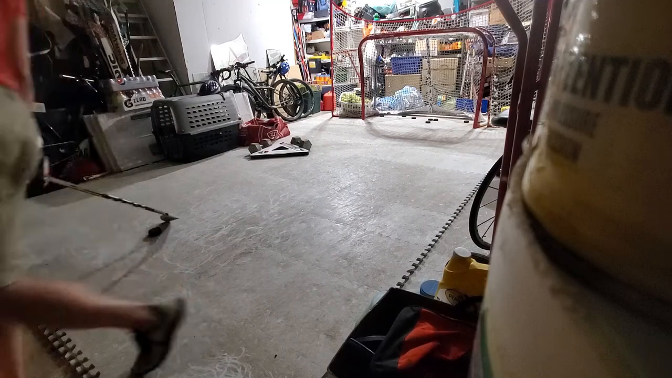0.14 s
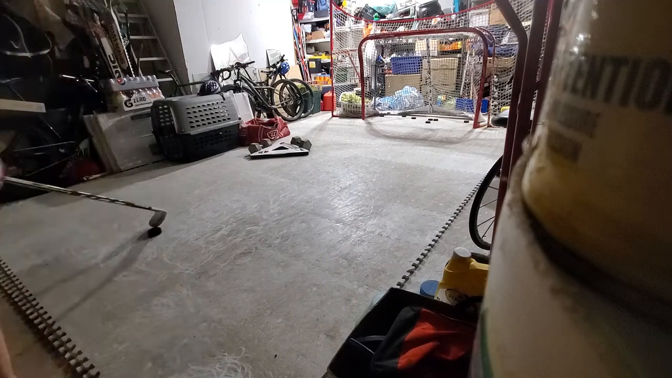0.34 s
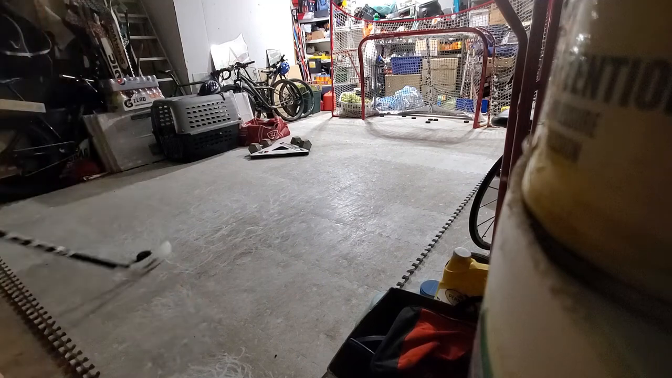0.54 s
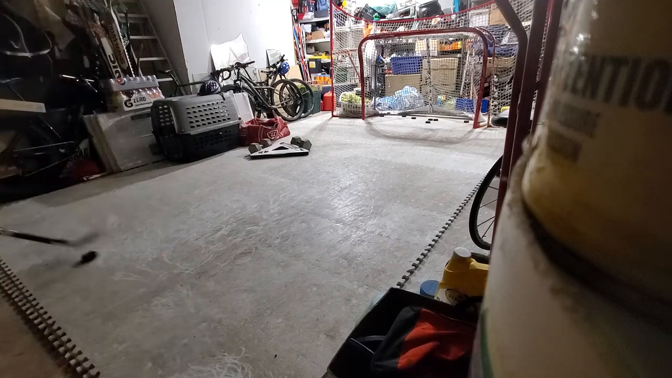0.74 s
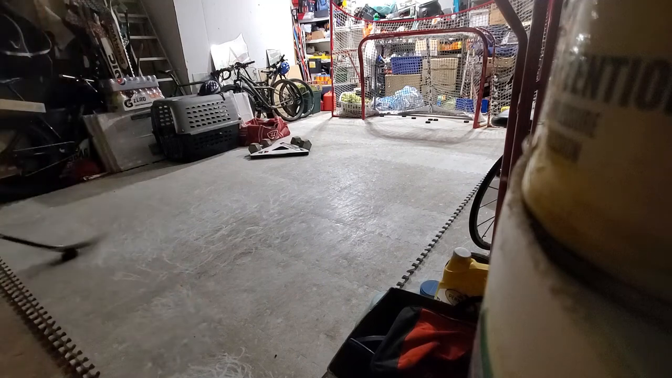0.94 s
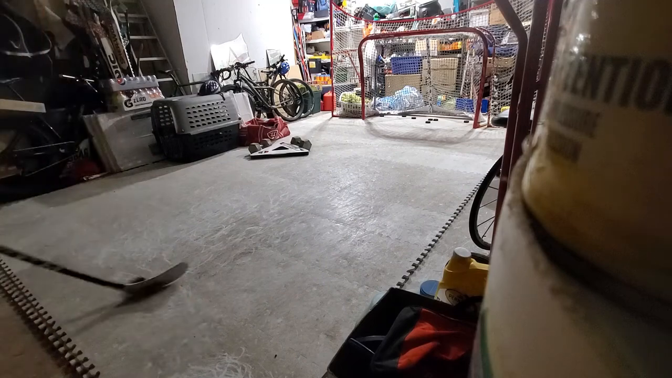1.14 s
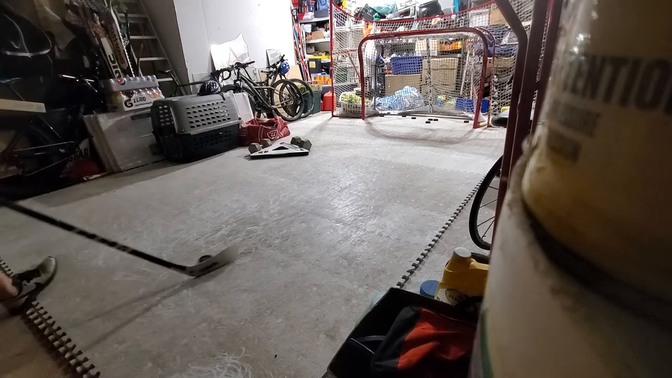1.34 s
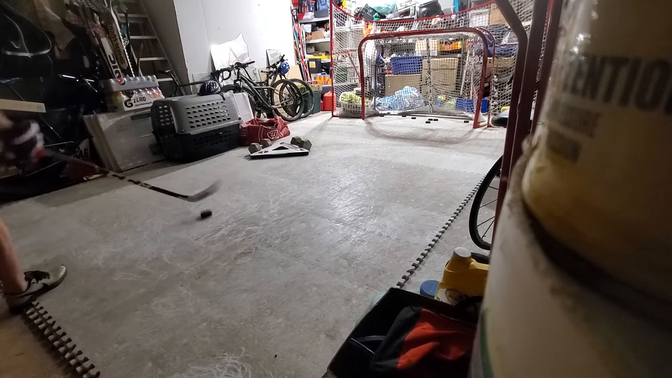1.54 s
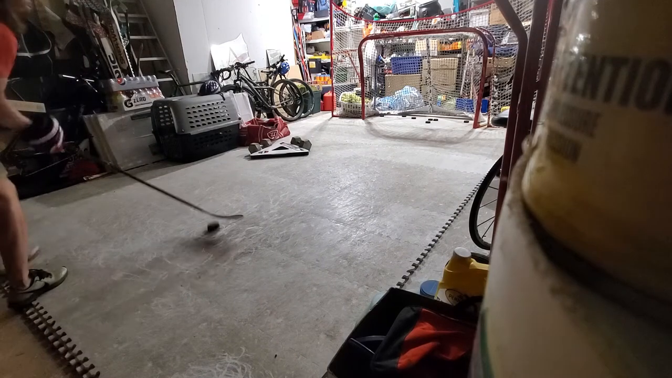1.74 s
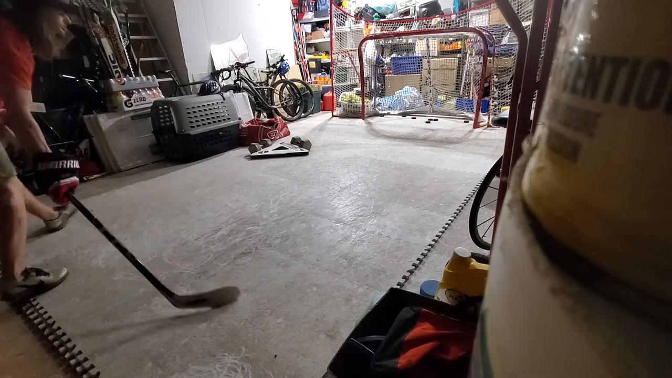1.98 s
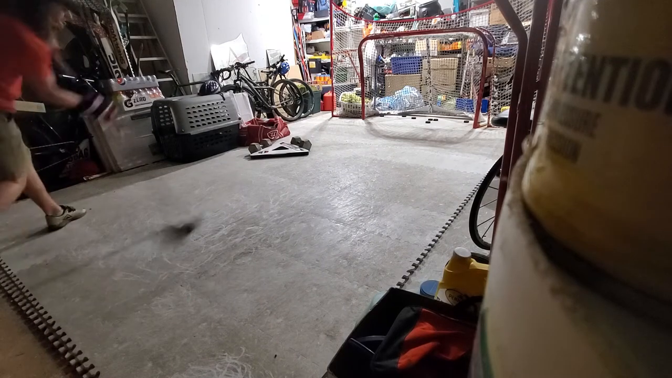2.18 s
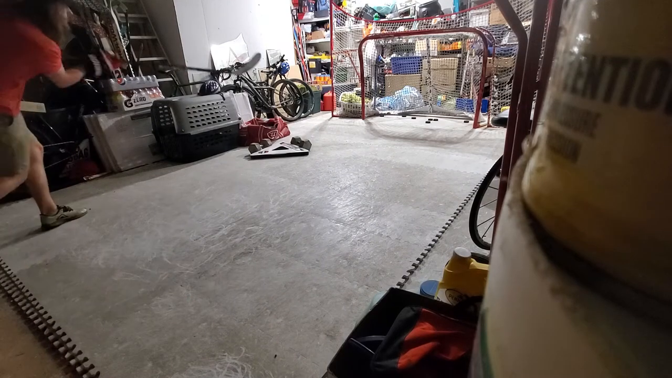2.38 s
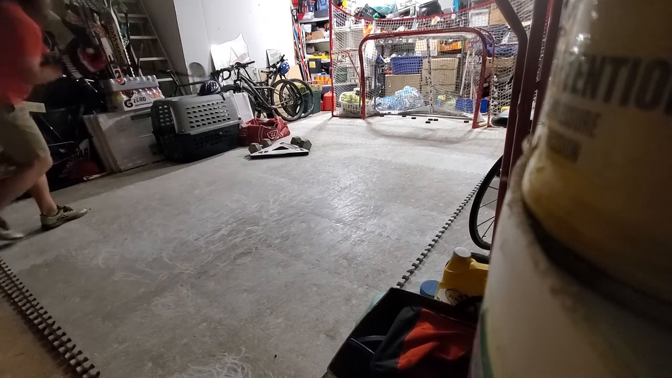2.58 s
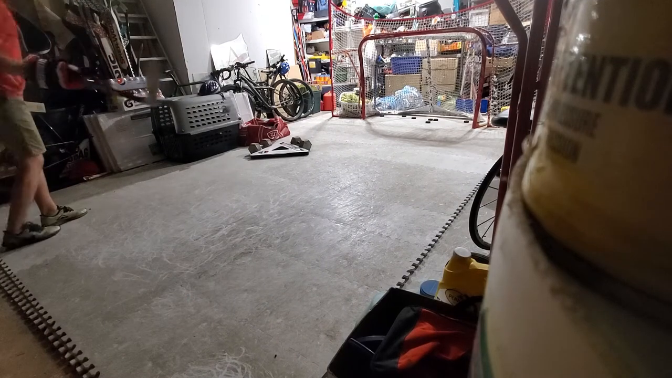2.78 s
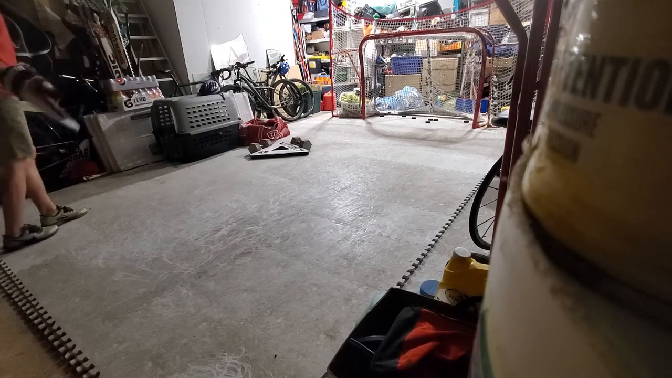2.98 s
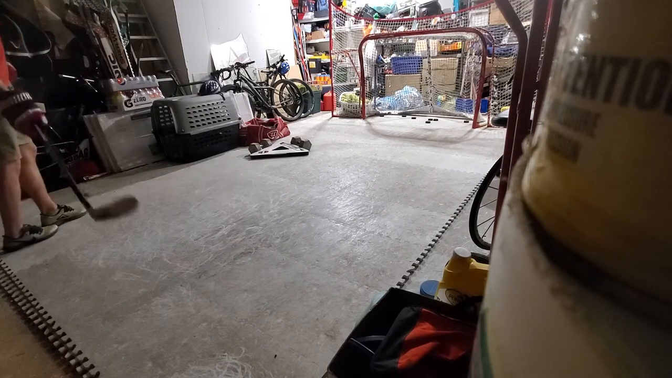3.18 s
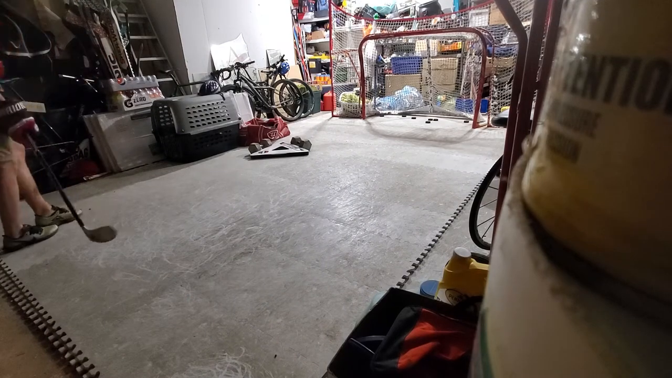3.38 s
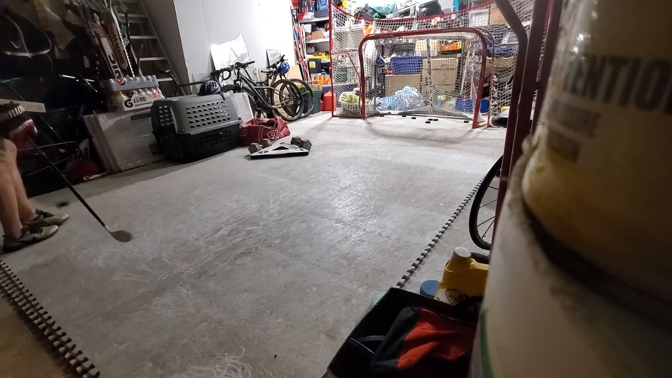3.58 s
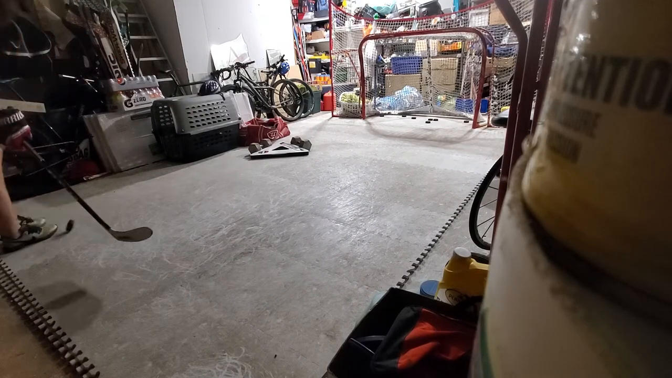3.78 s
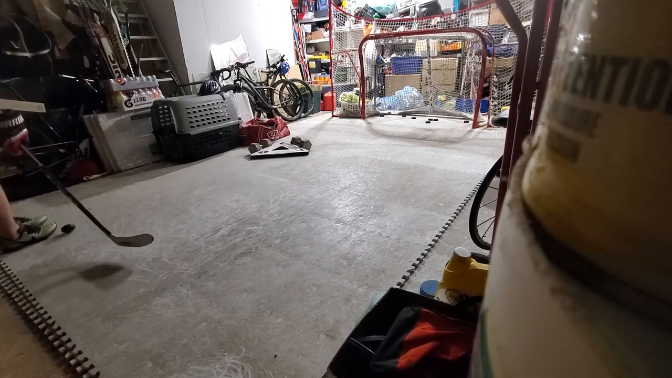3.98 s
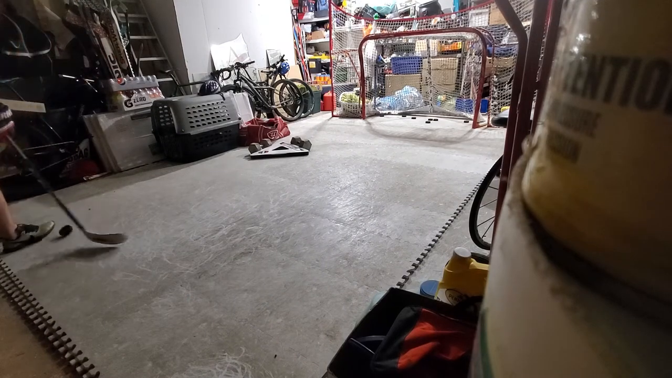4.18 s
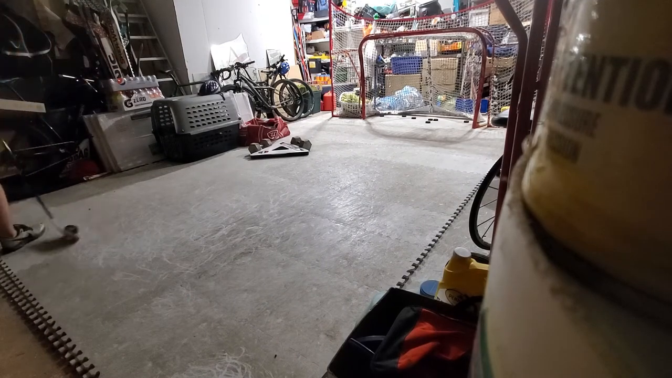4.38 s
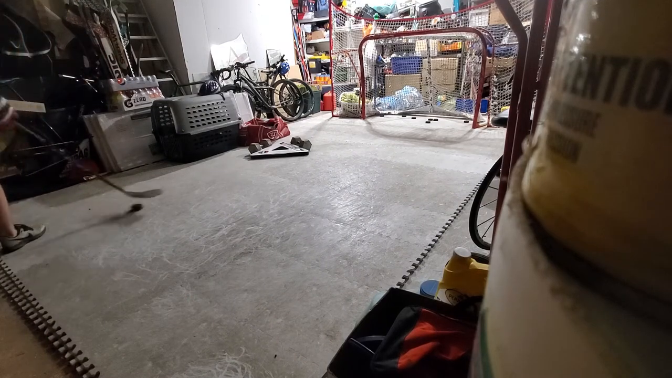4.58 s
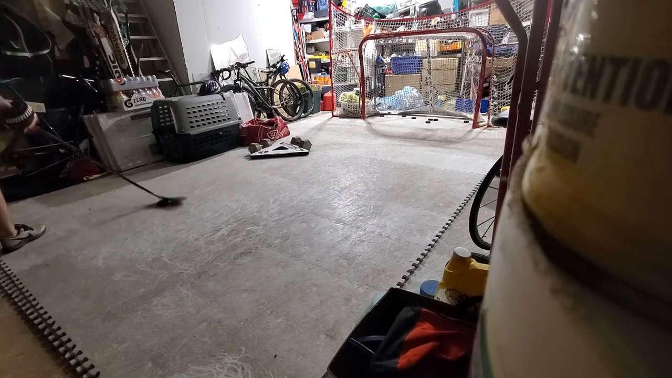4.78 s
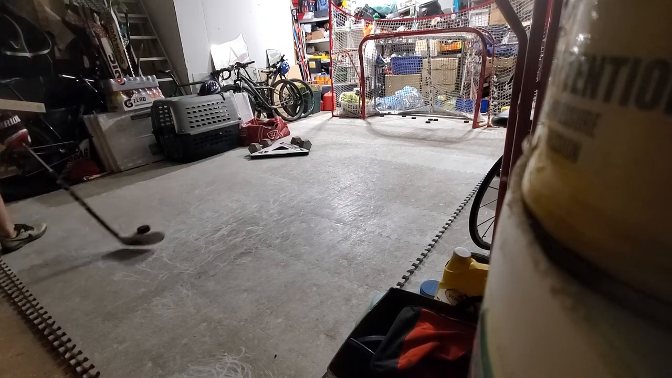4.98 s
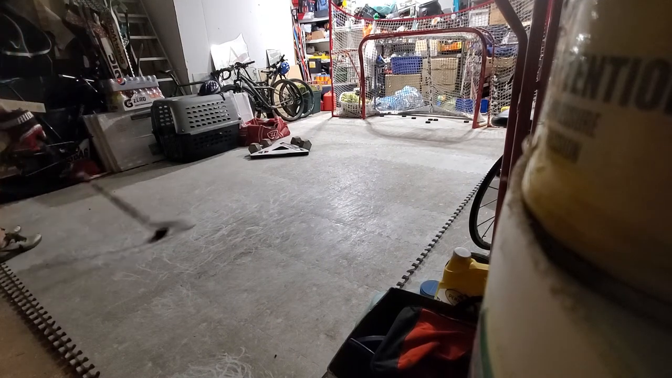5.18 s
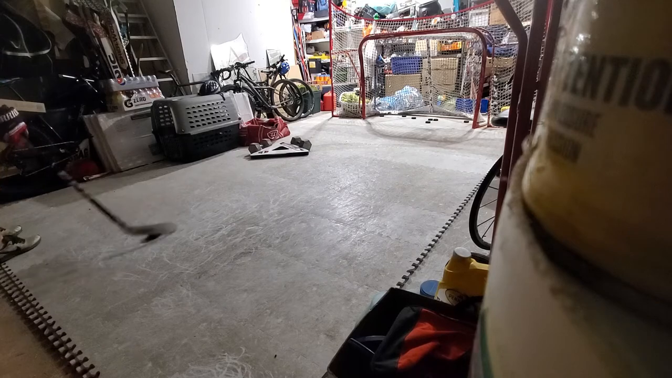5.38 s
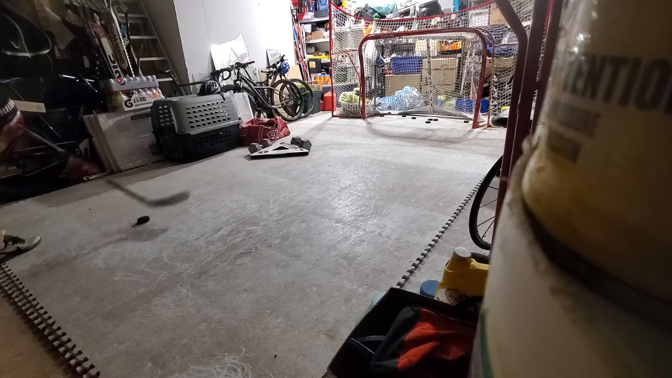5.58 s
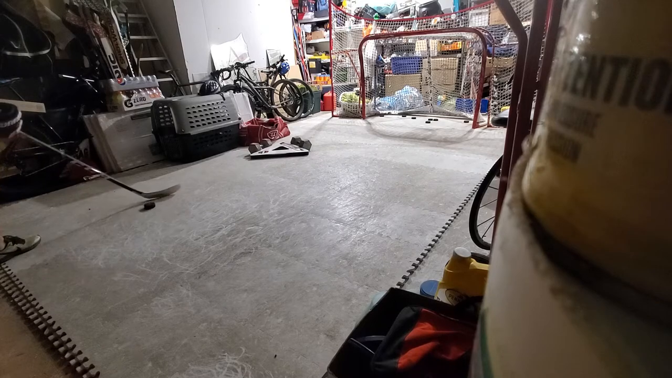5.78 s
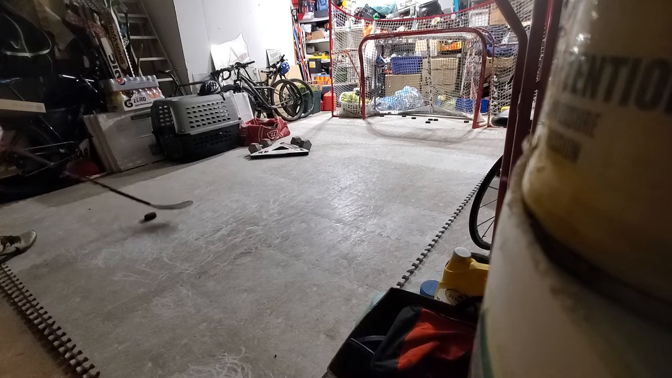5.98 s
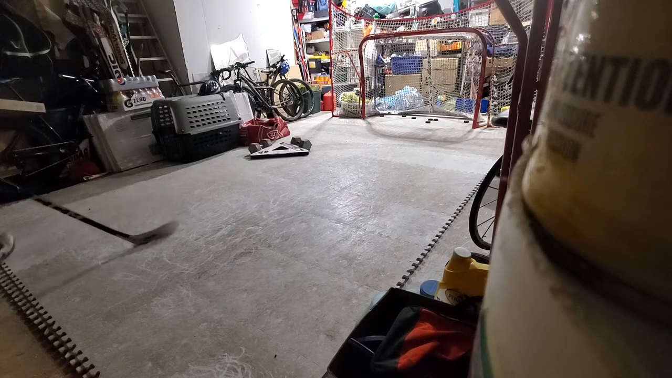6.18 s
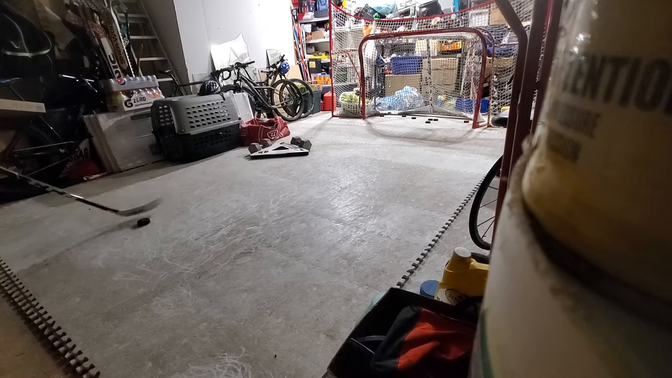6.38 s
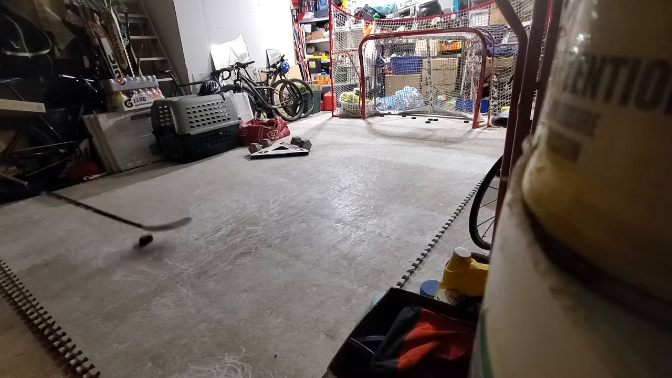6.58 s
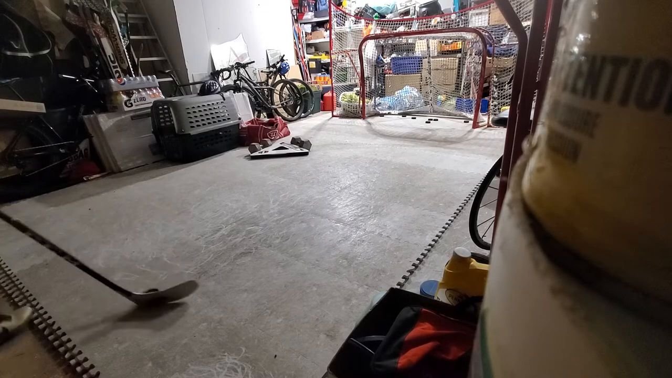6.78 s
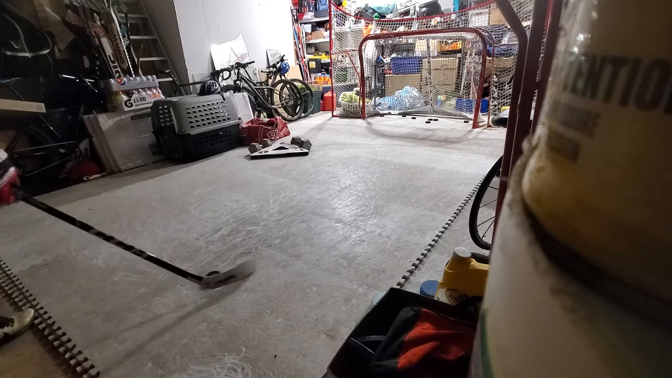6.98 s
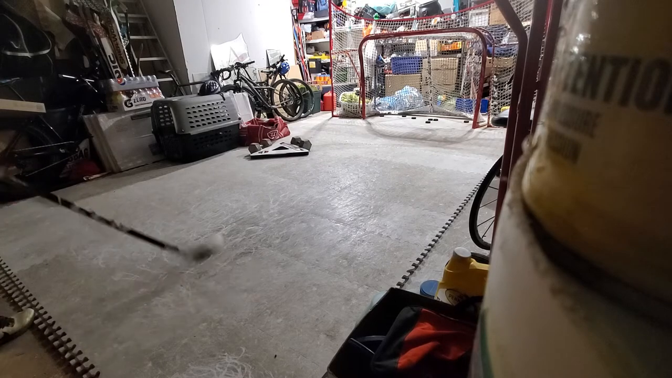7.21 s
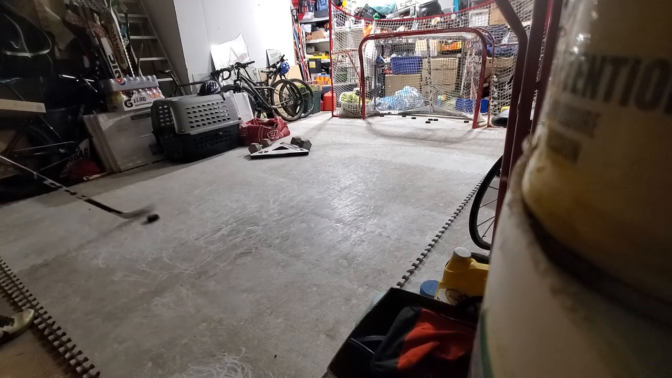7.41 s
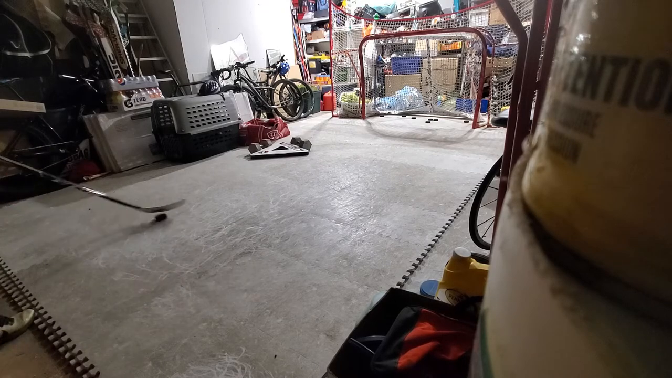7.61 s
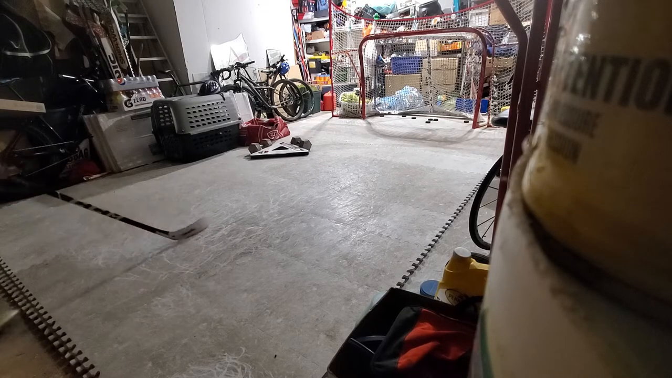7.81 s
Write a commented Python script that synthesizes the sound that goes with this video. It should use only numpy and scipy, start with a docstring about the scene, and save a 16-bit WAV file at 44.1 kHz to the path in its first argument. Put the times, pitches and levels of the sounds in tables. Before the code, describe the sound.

In a cluttered, hard-surfaced garage, a hockey stick dribbles a rubber puck over concrete with uneven woody knocks, blade slaps, gritty scrapes and low gliding rumble. After about two seconds a shot rasps away, cracks on the steel goal frame with a short ring, and the puck skitters to rest. After a few sparse knocks, dribbling picks up again to the end. Close stereo microphone, action to the left, short bright room echo, faint air.

```python
"""Faint air noise and the rumble of a gliding puck fade in, then the puck knocks on a stick's blade.
Stickhandling goes on over the concrete floor of a cluttered garage, to the listener's left.
Impacts are short pulses and noise bursts shaped by the stick's resonances; friction is a train of random catches.
One shot is swept away with a rasp and cracks against a ringing goal frame, and then the dribbling resumes.
Every source but the air and the dull thuds excites the room through a decaying stereo response."""
import sys
import numpy as np
from scipy import signal
from scipy.fft import rfft, irfft, next_fast_len
from scipy.io import wavfile
from scipy.ndimage import map_coordinates

SR = 44100
rng = np.random.default_rng(int(sys.argv[2]) if len(sys.argv) > 2 else 0)


def inscribe(sig):
    """Save sig as 16-bit PCM at rate SR to the path in sys.argv[1].

    A 1-D sig is mono; a 2-D sig holds one channel per row.
    Samples are clipped to [-1, 1] before scaling.
    """
    pcm = np.round(np.clip(np.atleast_2d(sig).T, -1, 1) * 32767)
    wavfile.write(sys.argv[1], SR, pcm.astype(np.int16))


N = 346185
SIZE = 32768  # samples in one impact or room response
T = np.arange(SIZE) / SR
HZ = np.fft.rfftfreq(SIZE, 1 / SR)


def amp(db):
    """Level and amplitude: 20 dB is a factor of ten."""
    return 10 ** (np.asarray(db) / 20)


def unit(x):
    """Normalisation: the root mean square becomes 1."""
    return x / np.sqrt(np.mean(x ** 2) + 1e-20)


def along(points, hz):
    """Logarithmic frequency scale: (f/Hz, value) points joined by straight lines."""
    f, value = np.transpose(points)
    return np.interp(np.log(hz + 1), np.log(f + 1), value)


def shape(points):
    """Spectral envelope: gain over frequency with a mean power of 1."""
    return unit(amp(along(points, HZ)))


def filtered(x, response):
    """Linear filtering: the spectrum of x is multiplied by a response of frequency."""
    size = next_fast_len(N + SR // 2)
    hz = np.fft.rfftfreq(size, 1 / SR)
    return irfft(rfft(x, size) * response(hz), size)[..., :N]


def pulse(gain):
    """Minimum phase: the most compact causal pulse with this spectrum, by folding its cepstrum."""
    cepstrum = irfft(np.log(np.maximum(gain, 1e-6)))
    cepstrum[1:SIZE // 2] *= 2
    cepstrum[SIZE // 2 + 1:] = 0
    return irfft(np.exp(rfft(cepstrum)))


def burst(gain, t60, delay=44):
    """Phase dispersion: decaying noise lends its phase, scattering a pulse's energy in time."""
    scatter = rfft(rng.standard_normal(SIZE) * amp(-60 * T / t60))
    crack = irfft(scatter / np.abs(scatter) * rfft(pulse(gain)))
    return np.roll(crack, delay) * (T < .1)


def add(out, s, sound):
    """Superposition: a stereo sound is summed in from time s."""
    start = int(np.clip(round(s * SR), 0, N - 1))
    out[:, start:start + sound.shape[1]] += sound[:, :N - start]


def wobble(rate):
    """Band-limited fluctuation: a smooth random curve with rate knots a second."""
    knots = rng.standard_normal(int(N * rate / SR) + 4)
    return map_coordinates(knots, [np.arange(N) * rate / SR])


def friction(spectrum, rate, spread_db):
    """Shot noise: about rate catches of uneven size a second, coloured by the body that they shake."""
    caught = rng.random(N) < rate / SR
    sizes = rng.standard_normal(N) * amp(spread_db * rng.uniform(-2.2, 1, N))
    return unit(filtered(caught * sizes, lambda hz: amp(along(spectrum, hz))))


# reverberation time of the garage: (f/Hz, t60/s)
DECAY_TIMES = [(60, 0.34), (200, 0.45), (600, 0.35), (1500, 0.44), (3000, 0.44), (6500, 0.41),
               (13000, 0.27)]
# likeness of the left and right echoes: (f/Hz, likeness from -1 opposite to 1 equal)
ECHO_LIKENESS = [(60, 0.85), (250, 0.71), (600, 0.52), (1300, -0.25), (3000, -0.17), (15000, 0.23)]


def garage(x, direct_db, lag_ms=.31, build_s=0.00037, early_db=2, early_s=0.0023,
           wall_db=-14, count=8, reach_s=.025):
    """Room response: a direct path that arrives left first, single echoes, and a new diffuse tail each time."""
    hz, t, z = signal.stft(rng.standard_normal((2, SIZE)), SR, nperseg=256)
    # mid and side shares set how alike left and right are
    turn = np.arccos(np.clip(along(ECHO_LIKENESS, hz), -1, 1))[:, None] / 2
    decay = amp(-60 * t / along(DECAY_TIMES, hz)[:, None])
    z = z * decay * np.array([np.cos(turn), np.sin(turn)])
    mid, side = signal.istft(z, SR, nperseg=256)[1][:, :SIZE]
    onset = (1 - np.exp(-T / build_s)) * amp(early_db * np.exp(-T / early_s))
    tail = np.array([mid + side, mid - side]) * onset
    paths = tail / np.linalg.norm(tail[0])
    lag = round(lag_ms * SR / 1000)
    paths[1] = np.roll(paths[1], lag // 3)
    # single echoes off the nearest surfaces, each from its own direction
    walls = lag + (rng.random(count) * reach_s * SR).astype(int)
    sizes = amp(wall_db) * rng.choice([-1, 1], count)
    paths[0, walls] += sizes
    paths[1, walls + rng.integers(-lag, lag + 1, count)] += sizes
    paths[[0, 1], [0, lag]] += amp(direct_db)
    return signal.fftconvolve(x[None], paths, axes=1)


# spectrum of the garage's background: (f/Hz, level per Hz/dB)
AIR_SPECTRUM = [(20, -24.5), (45, -12), (85, -0.5), (170, -14), (800, -10.5), (1800, -24), (16000, -47)]


def air(level_db=-69):
    """Stationary coloured noise: a steady rumble, mostly common to both sides."""
    noise = rng.standard_normal(N) + 0.29 * rng.standard_normal((2, N))
    return amp(level_db) * unit(filtered(noise, lambda hz: amp(along(AIR_SPECTRUM, hz))))


# the puck coasts over the floor: (start t/s, stop t/s, relative rumble level/dB, relative scrape level/dB)
COASTING = [(0.082, 0.45, -54, -57), (0.471, 0.838, -32.5, -44), (1.05, 2.313, -37, -45.5),
            (3.93, 4.38, -47, -84), (4.596, 5.716, -37, -54.5), (5.722, 5.92, -46.5, -53),
            (5.921, 6.37, -35.5, -45), (6.529, 7.85, -39, -49.5)]
# the blade pushes the puck: (t of peak pressure/s, half length/s, relative rumble level/dB, relative scrape level/dB)
BLADE_PUSHES = [(0.17, 0.027, -41, -47), (0.487, 0.047, -29, -33.5), (0.624, 0.055, -29.5, -34),
                (0.753, 0.068, -36.5, -34), (1.32, 0.045, -41, -34), (1.575, .05, -44.5, -42.5),
                (2.165, 0.05, -31, -30.5), (2.286, .05, -26.5, -22), (4.256, 0.03, -46, -54.5),
                (4.488, 0.11, -33, -46), (4.879, 0.067, -32.5, -56.5), (5.274, 0.097, -27.5, -35),
                (5.554, 0.073, -28.5, -38.5), (5.956, 0.033, -23.5, -29.5), (6.284, 0.045, -40.5, -43.5),
                (6.666, 0.14, -27, -49), (7.275, 0.13, -30, -41.5), (7.652, 0.15, -30.5, -59),
                (7.799, 0.032, -33.5, -44.5)]
GLIDE_START_S, GLIDE_STOP_S = 0.042, 0.047  # time constants of getting under way and of settling
RELEASE_OVER_PRESS = 0.79  # length of a push's easing off over that of its building up


def rubbing():
    """Incoherent power summation: rumble and scrape strength, steady in a glide and swelling in a push."""
    t, power = np.arange(N) / SR, np.zeros((2, N))
    for start, stop, *db in COASTING:
        begun = 1 - np.exp(-np.maximum(t - start, 0) / GLIDE_START_S)
        settling = np.exp(-np.maximum(t - stop, 0) / GLIDE_STOP_S)
        power += np.outer(amp(db), begun * settling) ** 2
    for s, length, *db in BLADE_PUSHES:
        half_length = np.where(t < s, length, length * RELEASE_OVER_PRESS)
        pressure = np.exp(-((t - s) / half_length) ** 2)
        power += np.outer(amp(db), pressure) ** 2
    return np.sqrt(power)


# spectra of the puck's rumble, the blade's scrape, loose sand and the slab's deep drone: (f/Hz, level per Hz/dB)
RUMBLE_SPECTRUM = [(40, -25.5), (140, -23), (190, -2), (270, -6), (360, 0), (550, -5), (800, -9),
                   (1200, -19.5), (2500, -42.5)]
SCRAPE_SPECTRUM = [(300, -25), (750, 5), (1200, 3.5), (1900, -4), (2600, -1.5), (4200, -5.5), (6400, -12),
                   (7600, -24.5), (12000, -18)]
GRIT_SPECTRUM = [(3000, -15), (6500, 6.5), (8000, -2), (11500, 3), (16000, 2.5)]
DRONE_SPECTRUM = [(20, -26.5), (55, 15), (110, 13), (200, -2), (400, -44)]


def slide(rumble_db=-1.5, scrape_db=1.5, grit_db=-16.0, drone_db=-43.5, clump_db=2.5, bump_db=1.57, bump_rate=28):
    """Sliding friction: the puck bumps along while the blade's edge scrapes over rough concrete."""
    rumble, scrape = rubbing()
    rough = amp(clump_db * wobble(45))  # rough and smooth patches of floor
    bumps = amp(rumble_db + bump_db * wobble(bump_rate))
    rub = bumps * rumble * friction(RUMBLE_SPECTRUM, rate=480, spread_db=2.5)
    rub += amp(scrape_db) * scrape * rough * friction(SCRAPE_SPECTRUM, rate=700, spread_db=9)
    # loose sand and the slab's deep drone grow more slowly than the pressure
    rub += amp(grit_db) * scrape ** 0.82 * rough * friction(GRIT_SPECTRUM, rate=1300, spread_db=10)
    rub += amp(drone_db) * rumble ** 0.2 * friction(DRONE_SPECTRUM, rate=1300, spread_db=-8.5)
    # each quarter second gets its own room response
    out, step = np.zeros((2, N)), SR // 4
    for start in range(0, N, step):
        add(out, start / SR, garage(rub[start:start + step], direct_db=-8.5))
    return out


# resonances of blade and shaft that every contact stirs: (f/Hz, width/Hz, level/dB)
STICK_MODES = [(377, 31, 1.5), (516, 140, 5.5), (713, 150, 5.5), (1196, 80, 3)]
TOCK_DB, PING_DB = 6, 5.5  # boost of the low and high resonances that move with the point of contact
TOCK_Q, PING_Q = 5.5, 6.9  # their sharpness


def blade(tock_hz, ping_hz):
    """Modal resonance: some peaks are always there, and two depend on where the stick is struck."""
    tock = (tock_hz, tock_hz / TOCK_Q, TOCK_DB)
    ping = (ping_hz, ping_hz / PING_Q, PING_DB)
    modes = STICK_MODES + [tock, ping]
    return amp(sum(db / (1 + (2 * (HZ - hz) / width) ** 2) for hz, width, db in modes))


# spectra of the dull knock, the woody clack and the bright crack of a contact: (f/Hz, level per Hz/dB)
KNOCK_SPECTRUM = [(25, -42.5), (60, -13.5), (140, -11.5), (180, 0.5), (270, -2.5), (350, 3.5), (450, -5),
                  (600, -5), (900, -7), (2000, -60.5)]
CLACK_SPECTRUM = [(300, -20.5), (550, -11), (740, -6), (950, -2), (1200, -4), (1700, -10), (2400, -24),
                  (6000, -41)]
CRACK_SPECTRUM = [(700, -28), (1500, -1), (2000, -3), (2450, 1), (3200, -3.5), (4200, -4), (5000, -7),
                  (6500, -12.5), (7600, -23), (12000, -38)]
FIRM_DB, SOFT_FADE = -17, .6  # hardness below which the direct sound weakens, and by how many dB per dB


def contacts(rows, knock_db, clack_db, clack_share, crack_db, grit_db,
             push_direct_db, crunch_direct_db, crunch_t60, chatter_db, flight_s):
    """Impact excitation: a push and a crunch, the harder the brighter, arriving flight_s later."""
    out = np.zeros((2, N))
    for s, db, hardness, grit, tock_hz, ping_hz in rows:
        stick = blade(tock_hz, ping_hz)
        knock = amp(knock_db) * unit(stick * shape(KNOCK_SPECTRUM))
        clack = amp(clack_share * hardness + clack_db) * unit(stick * shape(CLACK_SPECTRUM))
        push = pulse(np.hypot(knock, clack))
        # one edge lands first; the other follows with a weaker bump
        push = push + amp(chatter_db) * np.roll(push, int(rng.uniform(0.0076, .02) * SR))
        crunch = burst(amp(hardness + crack_db) * stick * shape(CRACK_SPECTRUM), crunch_t60)
        sand = burst(amp(grit + grit_db) * shape(GRIT_SPECTRUM), t60=0.0019)
        # a soft contact lands gradually, so less of it arrives as a sharp front
        front_db = push_direct_db + SOFT_FADE * min(hardness - FIRM_DB, 0)
        for sound, direct_db in ((push, front_db), (crunch, crunch_direct_db), (sand, -1.5)):
            add(out, s + flight_s, amp(db) * garage(sound[:SR // 10], direct_db))
    return out


# rubber puck against blade or floor; hardness is the crack over the knock, tock and ping the two moving resonances:
# (t/s, relative level/dB, relative hardness/dB, relative grit level/dB, tock f/Hz, ping f/Hz)
PUCK_KNOCKS = [(0.201, -21.5, -21.5, -51.5, 1080, 2600), (0.509, -23, -7.5, -30.5, 404, 4770),
               (0.556, -15, -17, -30.5, 410, 2820), (0.928, -26.5, -21.5, -18, 474, 5050),
               (0.986, -12, -7.5, -12, 510, 2600), (1.179, -25, -39.5, -30.5, 350, 1860),
               (1.194, -14, -9, -22.5, 345, 5830), (1.704, -8.5, -15, -14, 427, 3170),
               (1.722, -13, -14, -23.5, 423, 2660), (1.942, -17, -11.5, -9, 860, 3380),
               (1.955, -13, -12.5, -13, 393, 2900), (2.285, -20, 0.5, -8.5, 1160, 2960),
               (2.863, -25.5, -9, -10, 1130, 2330), (3.025, -15, -15.5, -30, 870, 1930),
               (3.034, -22, -21, -28.5, 330, 5860), (3.322, -49, -22, -32.5, 385, 2570),
               (3.765, -16.5, -12.5, -22, 418, 2710), (3.774, -13, -13.5, -26, 428, 1780),
               (3.931, -23.5, -32, -55, 523, 3630), (4.236, -30, -18.5, -41.5, 1100, 3310),
               (4.362, -30.5, -12.5, -14.5, 460, 1650), (4.481, -22, -17, -33.5, 543, 4690),
               (4.696, -20, -34, -47.5, 537, 4690), (4.789, -18.5, -27, -42.5, 1030, 3070),
               (4.837, -18, -18.5, -38, 540, 3070), (5.126, -25.5, -19.5, -23, 523, 3310),
               (5.381, -13.5, -10.5, -28, 400, 2900), (5.475, -12.5, -21.5, -46, 710, 3320),
               (5.872, -20, -28, -32, 580, 4580), (6.169, -10.5, -11, -21, 426, 4400),
               (6.496, -14, -18, -28.5, 1060, 2110), (6.795, -16.5, -15, -20.5, 635, 1860),
               (7.507, -19, -18, -18.5, 310, 5200), (7.831, -10, -14, -20, 850, 1860)]


def knocks():
    """Impact of rubber: a knock through the stick's resonances with a crunch that disperses more."""
    return contacts(PUCK_KNOCKS, knock_db=24.0, clack_db=22.5, clack_share=0.26, crack_db=26.5, grit_db=24,
                    push_direct_db=-5.5, crunch_direct_db=-4.5, crunch_t60=0.0086, chatter_db=-9, flight_s=.002)


# blade flat on the concrete:
# (t/s, relative level/dB, relative hardness/dB, relative grit level/dB, tock f/Hz, ping f/Hz)
BLADE_SLAPS = [(0.713, -22, 0, -27.5, 880, 1680), (1.273, -22.5, 1, -30, 1290, 2380),
               (1.503, -12.5, -14.5, -28.5, 860, 2250), (2.001, -9.5, -17.5, -28.5, 585, 4740),
               (5.202, -23, -1.5, -1.5, 686, 4740), (5.961, -11.5, -19.5, -22, 550, 4250),
               (6.232, -12.5, -15, -14, 684, 5190), (6.551, -14, -13.5, -23, 910, 3100),
               (6.871, -12, -14, -22.5, 1050, 4800), (7.2, -14.5, -14.5, -23, 380, 1890),
               (7.564, -14, -11.5, -47, 1020, 4200)]


def slaps():
    """Flat-plate impact: the blade throws its pressure pulse straight at the listener."""
    return contacts(BLADE_SLAPS, knock_db=20.0, clack_db=30.5, clack_share=0.72, crack_db=25, grit_db=26,
                    push_direct_db=1, crunch_direct_db=-5, crunch_t60=0.0012, chatter_db=-17.0, flight_s=0.0022)


SKID_RISE_S, SKID_S = 0.015, 0.074  # the blade bites, then stays pressed down about this long


def skids(scrape_db=-13, grit_db=-11):
    """Friction under falling pressure: after a slap the blade skids on over the concrete and lifts."""
    out = np.zeros((2, N))
    scrape = friction(SCRAPE_SPECTRUM, rate=550, spread_db=1)
    sand = friction(GRIT_SPECTRUM, rate=700, spread_db=4)
    pressure = (1 - np.exp(-T / SKID_RISE_S)) * np.exp(-(T / SKID_S) ** 2)
    for s, db, hardness, grit, *_ in BLADE_SLAPS:
        rub = amp(hardness + scrape_db) * scrape + amp(grit + grit_db) * sand
        rub = np.roll(rub, -round(s * SR))[:SIZE]
        add(out, s, garage(amp(db) * pressure * rub, direct_db=-18))
    return out


# grit cracking under the blade: (t/s, relative level/dB)
GRIT_TICKS = [(1.135, -40), (1.364, -30), (1.5321, -33)]


def ticks(level_db=22):
    """Brittle fracture: single grains of sand crack in dispersed treble bursts."""
    out = np.zeros((2, N))
    for s, db in GRIT_TICKS:
        grain = burst(shape(GRIT_SPECTRUM), t60=0.035)
        add(out, s, amp(db + level_db) * garage(grain, direct_db=5.5))
    return out


# the blade's edge catches and chirps: (t/s, relative level/dB, f/Hz)
EDGE_SQUEAKS = [(1.656, -40.5, 4850), (6.983, -36.5, 3520)]


def squeaks(level_db=2, width=0.26, length_s=0.0029):
    """Stick-slip: a brief flutter of noise in a narrow band."""
    out = np.zeros((2, N))
    for s, db, hz in EDGE_SQUEAKS:
        band = np.exp(-((HZ / hz - 1) / width) ** 2)
        flutter = unit(irfft(rfft(rng.standard_normal(SIZE)) * band))
        swell = T / length_s * np.exp(1 - T / length_s)
        add(out, s, garage(amp(db + level_db) * swell * flutter, direct_db=2.0))
    return out


# force of the blade as it sweeps the shot along the floor: (t/s, relative level/dB)
SHOT_FORCE = [(2.101, -50), (2.18, -37.5), (2.25, -42), (2.294, -19), (2.345, -20), (2.365, -28),
              (2.42, -45)]
# spectrum of the rasp: (f/Hz, level per Hz/dB)
SWEEP_SPECTRUM = [(150, -16), (400, -5), (800, -2), (1180, 9), (1900, -1), (2800, -4), (6000, -8),
                  (8000, -23), (16000, -21)]


def sweep(clump_db=-5.0):
    """Force-modulated friction: the rasp swells and fades as the blade drags the puck along."""
    s, db = np.transpose(SHOT_FORCE)
    force = amp(np.interp(np.arange(N) / SR, s, db) + clump_db * wobble(70))
    rasp = force * friction(SWEEP_SPECTRUM, rate=2200, spread_db=4.0)
    out = np.zeros((2, N))
    add(out, s[0], garage(rasp[int(s[0] * SR):int(s[-1] * SR)], direct_db=-6.0))
    return out


# dull thuds of feet and of the landing puck: (t/s, level/dB, f/Hz, t60/s)
DULL_THUDS = [(2.321, -40.5, 75, 0.24), (2.405, -35.5, 56, 0.47), (2.865, -22.5, 189, 0.18),
              (2.875, -21.5, 120, 0.15)]


def thuds(rise_s=0.0069):
    """Low room modes: each heavy soft blow booms as one decaying sine, equal on both sides."""
    out = np.zeros((2, N))
    for s, db, hz, t60 in DULL_THUDS:
        envelope = amp(db - 60 * T / t60) * (1 - np.exp(-T / rise_s))
        boom = np.sin(2 * np.pi * hz * T) * envelope
        add(out, s, np.array([boom, boom]))
    return out


# puck on the goal frame: (t/s, relative level/dB)
FRAME_HITS = [(2.4846, -15), (2.509, -20.5), (2.524, -19)]
# ringing modes of the steel frame: (f/Hz, relative level/dB, t60/s)
FRAME_MODES = [(1385, -7, 0.46), (1430, -8, 0.57), (2320, 3.5, 0.13), (3085, -18, 0.35),
               (3720, -12.5, 0.34), (4100, -21.5, 0.4)]
# spectrum of the crash: (f/Hz, level per Hz/dB)
CRASH_SPECTRUM = [(100, -53), (200, -10.5), (300, -26.5), (560, -4), (1000, -6), (1400, 5.5), (1900, -4.5),
                  (2400, -0.5), (3800, -6), (6400, -11), (8000, -18.5), (16000, -18.5)]


def goal(crash_db=32, ring_db=-17):
    """Modal ringing: the puck cracks on the steel frame, whose modes decay as sines."""
    out = np.zeros((2, N))
    for s, db in FRAME_HITS:
        ring = np.zeros(SIZE)
        for hz, level, t60 in FRAME_MODES:
            # every hit stirs each mode a little differently
            ring += amp(level + rng.normal(0, 2) - 60 * T / t60) * np.sin(2 * np.pi * hz * T)
        crash = amp(crash_db) * burst(shape(CRASH_SPECTRUM), t60=0.011)
        add(out, s, amp(db) * garage(crash + amp(ring_db) * ring, direct_db=-5))
    return out


def skitter(start_s=2.66, length_s=.19, scrape_db=-39, grit_db=-56, rumble_db=-55, t60=0.67):
    """Decaying friction: the puck, dropped from the goal frame, skitters to rest."""
    bright = amp(scrape_db) * friction(SCRAPE_SPECTRUM, rate=2300, spread_db=17.0)
    bright += amp(grit_db) * friction(GRIT_SPECTRUM, rate=900, spread_db=-0.5)
    low = amp(rumble_db) * friction(RUMBLE_SPECTRUM, rate=87, spread_db=-13.5)
    rub = bright[:SIZE] * amp(-60 * T / t60) + low[:SIZE]
    out = np.zeros((2, N))
    add(out, start_s, garage(rub * np.clip((length_s - T) / 0.022, 0, 1), direct_db=-5))
    return out


# level of the left side over the right: (f/Hz, level difference/dB)
LEFT_OVER_RIGHT = [(100, -1.5), (280, 2), (600, 2), (1200, 0.7), (2600, 4), (5000, 2.5), (9000, 5.5),
                   (13000, 6)]


def scene():
    """Interaural level difference: all play lies to the left, shading the right; the air does not."""
    play = slide() + knocks() + slaps() + skids() + ticks() + squeaks()
    play += sweep() + thuds() + goal() + skitter()
    # each side takes half of the difference
    placed = filtered(play, lambda hz: amp(np.outer([.5, -.5], along(LEFT_OVER_RIGHT, hz))))
    return placed + air()


def record(dry, start_s=0.1, fade_s=0.018, ceiling=.95, top_hz=16000):
    """Saturation and band limiting: a fade-in from silence, rounded peaks, nothing above top_hz."""
    opened = dry * np.clip((np.arange(N) / SR - start_s) / fade_s, 0, 1)
    rounded = opened / (1 + np.abs(opened / ceiling) ** 4) ** (1 / 4)
    return filtered(rounded, lambda hz: hz < top_hz)


dry = scene()
out = record(dry)
inscribe(out)
```